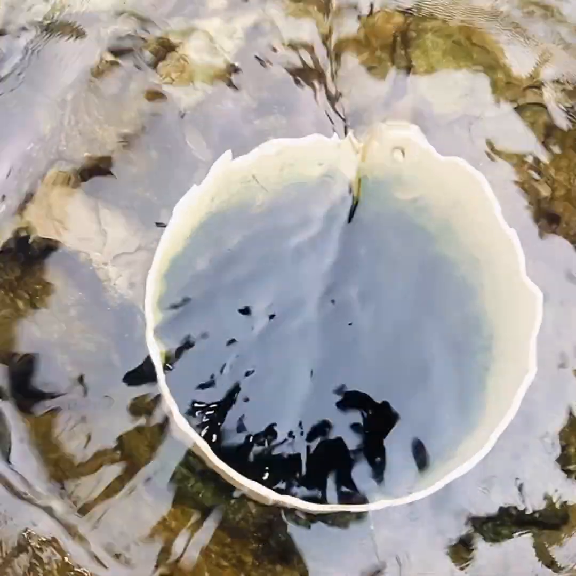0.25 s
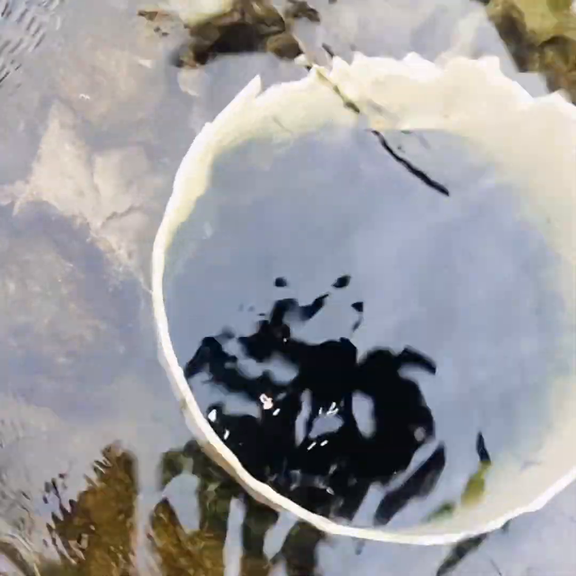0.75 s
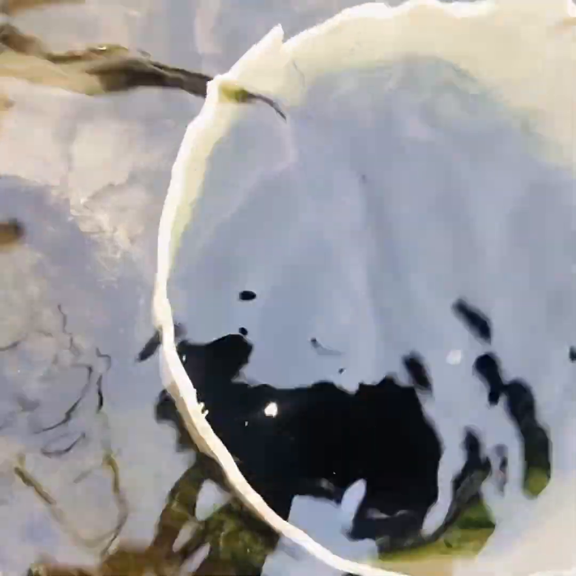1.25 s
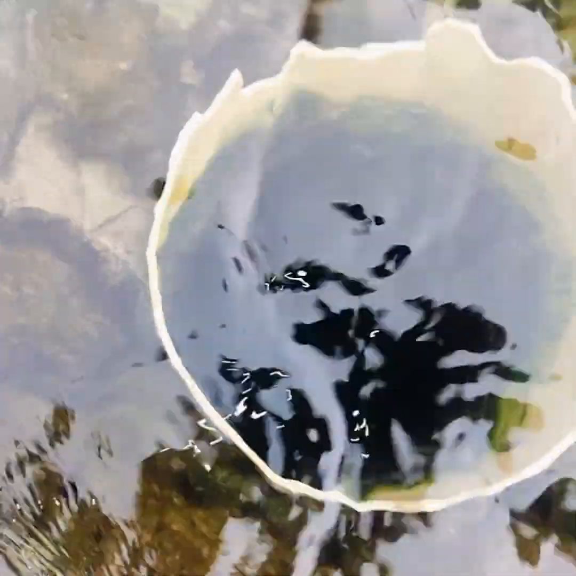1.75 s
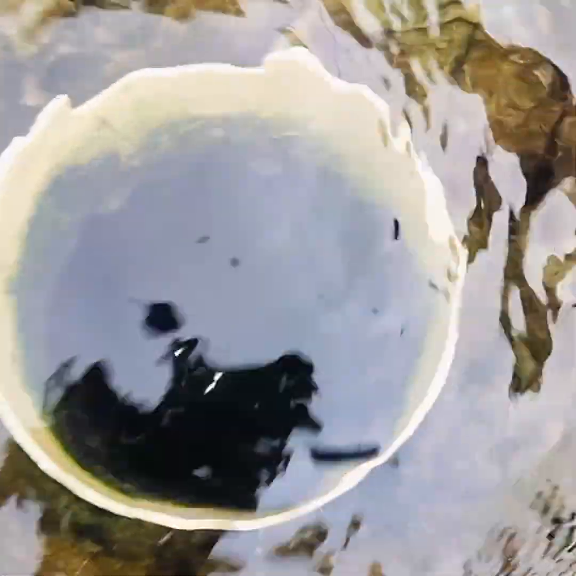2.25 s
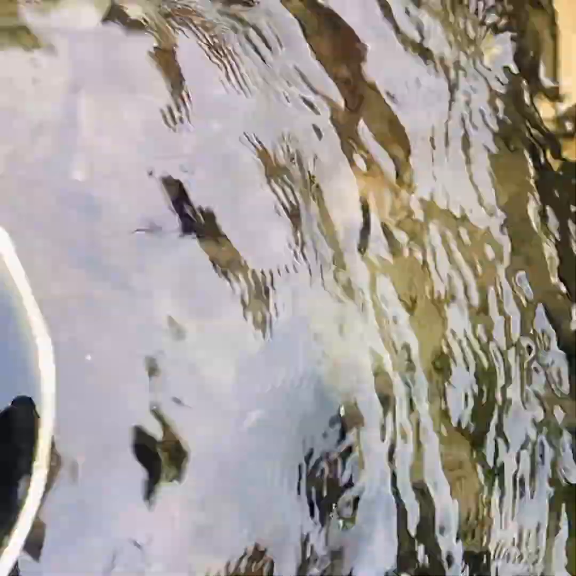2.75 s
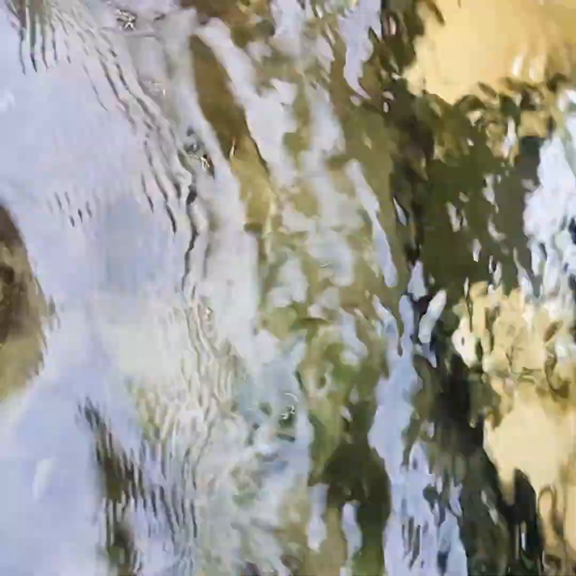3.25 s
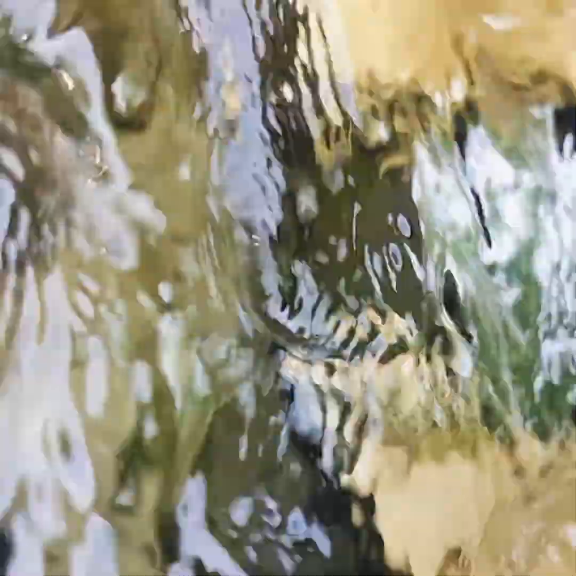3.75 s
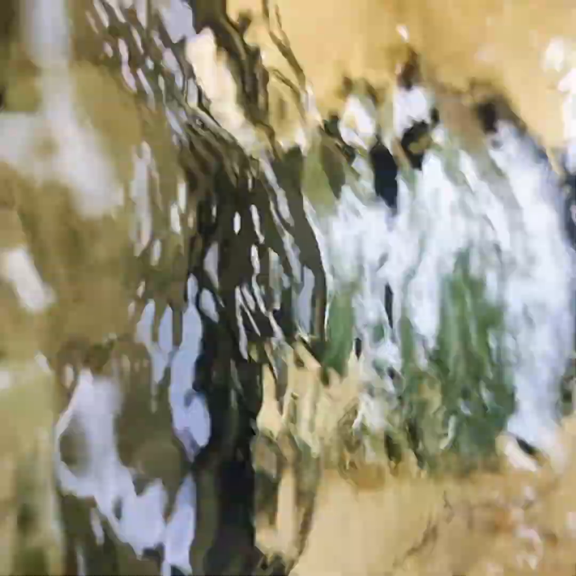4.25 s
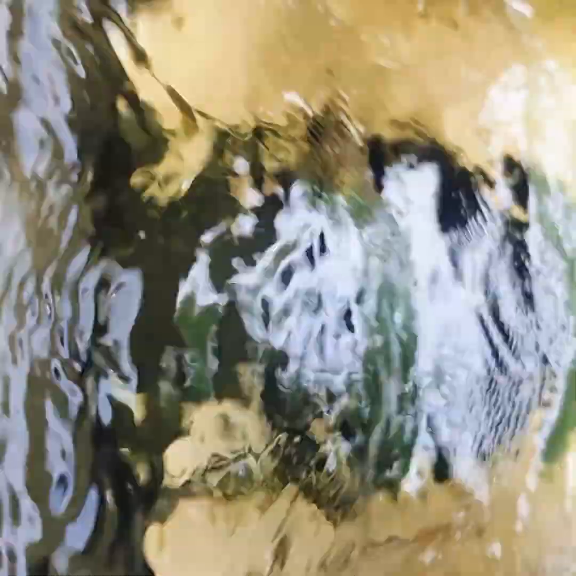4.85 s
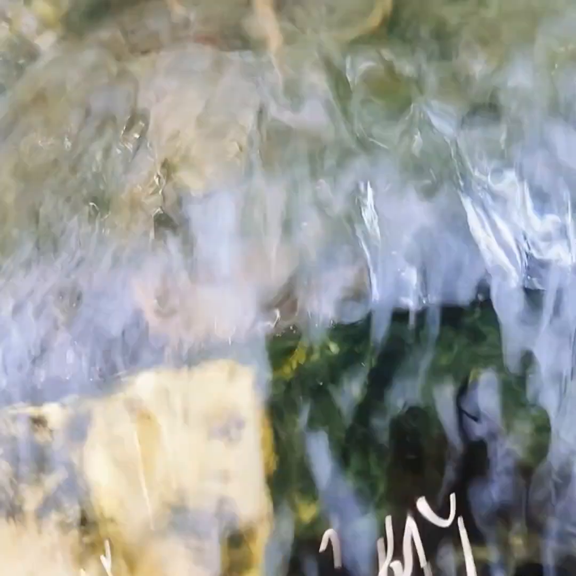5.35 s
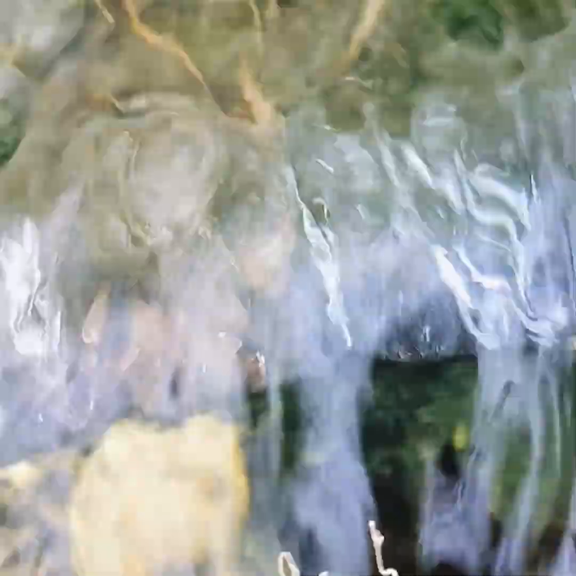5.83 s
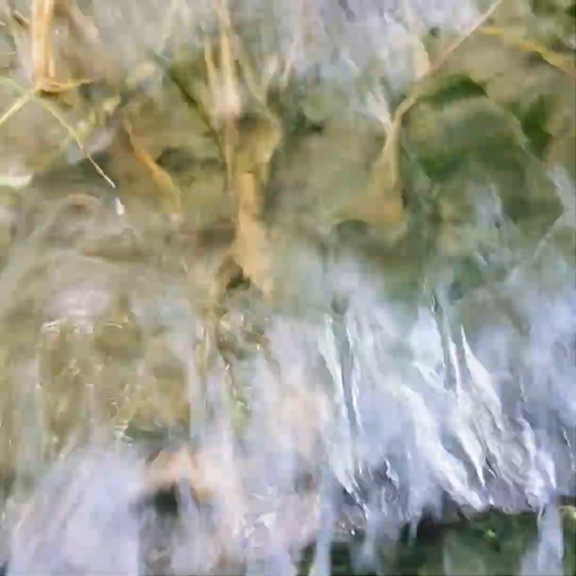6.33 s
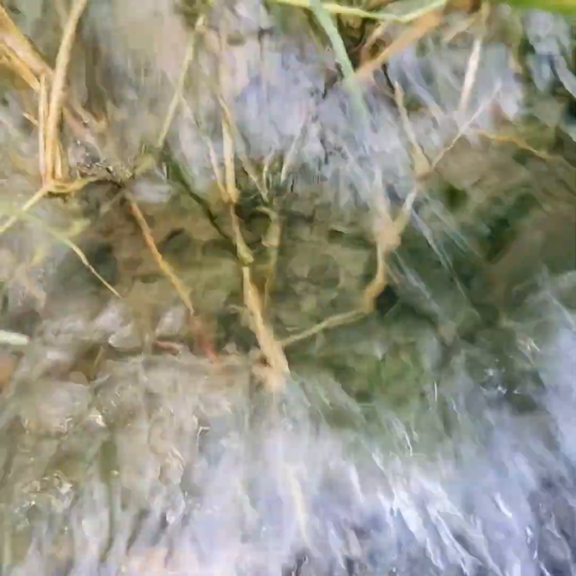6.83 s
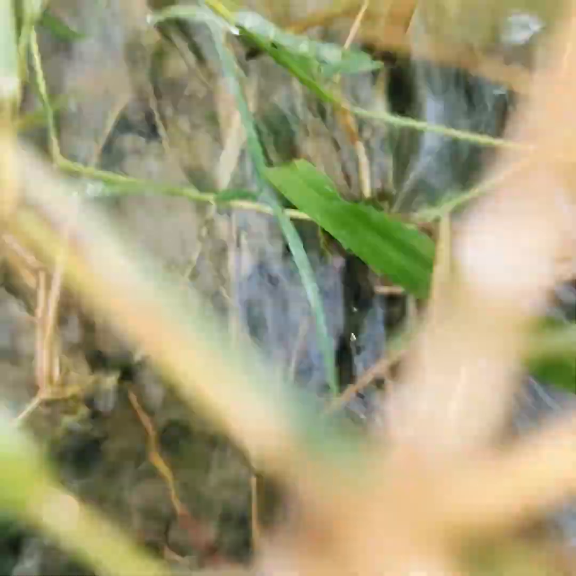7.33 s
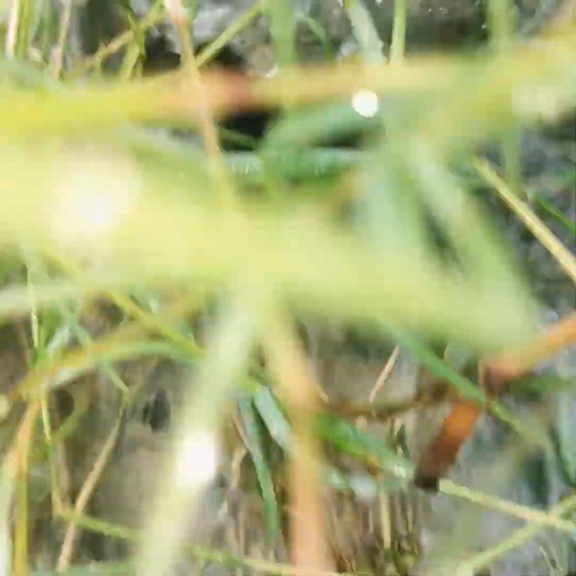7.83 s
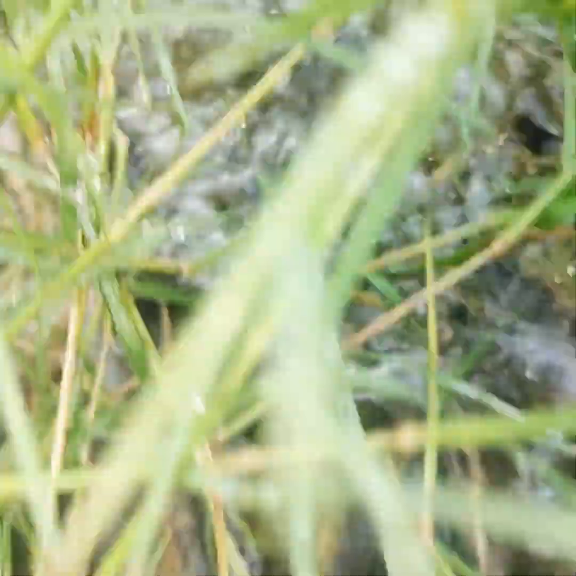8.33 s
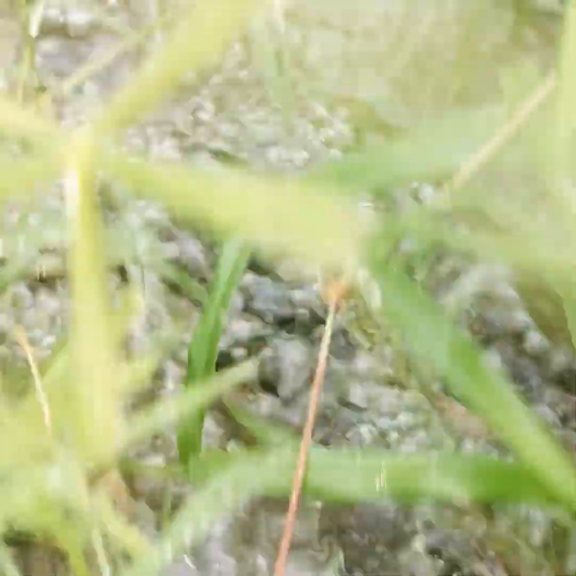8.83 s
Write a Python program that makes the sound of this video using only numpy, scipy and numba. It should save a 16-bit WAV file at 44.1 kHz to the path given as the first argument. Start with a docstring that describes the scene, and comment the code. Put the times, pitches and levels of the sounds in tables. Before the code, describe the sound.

Water trickles and gurgles over stones with small drips and plops, growing louder over a faint low rumble, twice cut by silence.

```python
"""Water wells out of a field inlet and trickles over stones into a paddy.
Each trapped bubble is a damped oscillator, its air the spring and the water the mass: large ones gurgle,
small ones fizz, and splashes spray on top. Hollows between stones and banks colour the water.
A deep drone throbs far off, wind stirs the two ports of a hand-held microphone, and a finger and a stem
each knock it once. The sound comes in three stretches with silence between."""
import sys
import numpy as np
from scipy import signal
from scipy.fft import rfft, irfft
from scipy.io import wavfile
from scipy.ndimage import uniform_filter1d, map_coordinates
from numba import njit

SR = 44100
rng = np.random.default_rng(int(sys.argv[2]) if len(sys.argv) > 2 else 0)


def transcribe(signal):
    """Save signal, clipped to [-1, 1], as a 16-bit WAV file at the path in sys.argv[1]."""
    frames = np.atleast_2d(signal).T
    limited = np.clip(frames, -1, 1)
    pcm = np.round(limited * 32767).astype(np.int16)
    wavfile.write(sys.argv[1], SR, pcm)


N = 400428

# Audible stretches (start [s], end [s])
STRETCHES = [(0, .3055), (.79, 5.511), (6.04, 9.08)]
# The water grows louder nearer the riffle (time [s], burble level [dB], fizz over burble [dB])
RIFFLE_LEVELS = [(.05, -50, -8.5), (0.281, -48, -6.5), (.85, -46, 1.5), (1.5, -44.5, 0.5), (2.1, -46, 0),
                 (3, -44.5, 0), (3.5, -42, 0), (4.4, -40, -1.5), (5.2, -42, -2.5), (5.46, -40.5, 1),
                 (6.1, -36.5, 2), (6.28, -35, 1), (6.68, -38.5, 2), (6.82, -36.5, 2), (7.1, -38, 1.5),
                 (8.1, -37.5, 2), (8.6, -36, 1.5), (9.05, -37, 0.4)]
# The deepest bubbles (time [s], level [dB])
GLUG_LEVELS = [(.15, -55.5), (.9, -63), (3, -63.5), (3.5, -75.5), (4.8, -78), (5.2, -52), (5.45, -60.5),
               (6.1, -47), (7.1, -48.5), (8.5, -57), (9.05, -52)]
# Spectral envelope of water and microphone (frequency [Hz], relative gain [dB])
WATER_SPECTRUM = [(150, -38), (250, -13.5), (324, -24.5), (413, -16), (507, -21), (624, -12), (809, -10),
                  (995, -7.5), (1480, -7), (2280, -4.5), (5220, -7.5), (6210, -5), (8920, -17.5),
                  (11600, -18)]
# Arrival-time difference as the microphone turns (time [s], lag of the left port [ms])
PORT_LAG = [(0, 0.26), (.801, 0.12), (2.601, 0.211), (3.201, -0.262), (5.4, -0.282), (6.1, 0.137),
            (8.3, -0.13), (8.8, -0.5)]
# Resonances and dead spots at three places (frequency [Hz], bandwidth [Hz], gain [dB])
INLET_HOLLOWS = [(890, 29, 4.5), (1664, 48, 4.5), (1755, 130, -13.5), (1840, 91, 6.5), (3300, 150, -3)]
STONE_HOLLOWS = [(1021, 62, -12.5), (1299, 90, 8), (1572, 50, 6.5), (1764, 87, -20), (3160, 210, -5),
                 (1800, 42, 12.5), (1930, 80, -17.5), (2094, 64.6, -18)]
STEM_HOLLOWS = [(1816, 560, -2)]
# Drone resonances (frequency [Hz], bandwidth [Hz], weight at the inlet [dB], weight among stems [dB])
DRONE_MODES = [(42.6, 13, -25, -12.5), (62.85, 10.2, -2, -3.5), (79.14, 5.5, -10.5, -1.5),
               (108, 8, -5.5, -10.5), (126, 19.8, -8, -7), (159.6, 23.5, -12.5, -17),
               (201, 31.4, -17.5, -17)]
# Finger impact (step level [dB], decay [s], left share [dB], port frequency [Hz], ring level [dB])
FINGER_IMPACT = (-11, .0042, -16, 6200, -7)
# The sharpest drops and the loudest bubbles (time [s], level [dB], frequency [Hz])
SHARP_DROPS = [(1.098, -21.5, 4670), (1.197, -26, 4900), (1.668, -22, 4800), (1.9283, -16.5, 6000),
               (2.095, -21, 5670), (2.236, -27, 6060), (2.2595, -23.5, 5700), (2.2817, -25, 5920),
               (2.378, -28, 6100), (3.066, -26, 4250), (3.2657, -25, 4320), (3.5256, -20, 7200),
               (3.7287, -11.5, 5200), (3.821, -24.5, 4200), (4.0077, -15, 4970), (4.271, -14, 5600),
               (4.876, -16.5, 6040), (5.0425, -19.5, 4940), (5.405, -19, 5200), (5.4273, -11, 6000),
               (6.0847, -7.5, 4020), (6.3443, -16, 4070), (6.61, -15, 6020), (6.693, -7.5, 7055),
               (6.845, -23, 5900), (7.024, -17.5, 6570), (7.1232, -21, 6240), (7.2237, -18, 4730),
               (7.3984, -16, 3570), (7.7403, -17, 4070), (7.9434, -15.5, 3200), (7.996, -14, 2870),
               (8.0266, -17, 6400), (8.2095, -17, 6230), (8.2403, -17, 5470), (8.273, -11, 2920),
               (8.3325, -18, 4570), (8.3741, -25, 6180), (8.411, -16, 6620), (8.4308, -27, 6890),
               (8.556, -11.5, 4620), (8.682, -12.5, 6260), (8.715, -6, 3920), (8.9024, -11, 5850)]
LOUD_BUBBLES = [(1.241, -24.5, 1740), (1.766, -23.5, 1600), (2.216, -31, 900), (2.286, -24, 1750),
                (2.406, -34, 686), (2.46, -16, 2680), (2.875, -29.5, 2420), (3.042, -25, 1700),
                (4.081, -19, 2120), (4.161, -18, 1330), (4.508, -23, 2550), (4.587, -22, 1310),
                (4.934, -19.5, 2230), (5.128, -28, 640), (6.265, -9.5, 3000), (6.543, -22, 1055),
                (6.683, -21, 2370), (6.779, -22.5, 630), (6.81, -23.5, 1110), (7.122, -16, 1010),
                (7.4, -15, 1004), (7.493, -23, 950), (7.528, -18.5, 2960), (7.555, -26, 1290),
                (7.698, -22, 1300), (7.865, -23.5, 1040), (7.911, -26, 836), (7.953, -18.5, 1920),
                (8.019, -22, 1000), (8.081, -17, 2590), (8.201, -22, 1200), (8.221, -18, 1090),
                (8.449, -17, 943), (8.642, -19, 2080), (8.906, -19.5, 2100)]
# The trickle thins: coarse fizz fades and drops tinkle by the right port
# (centre [s], half length [s], fizz gain [dB], added left minus right of drops [dB])
TRICKLE_LULL = (2.5, .5, -3, -17)
# Bright splashes (time [s], level [dB], centre frequency [Hz], decay [s])
BRIGHT_SPLASHES = [(2.594, -40, 7100, 0.032), (3.066, -36, 12500, 0.0055), (4.266, -34.5, 6960, .025),
                   (4.468, -40, 11500, .02), (5.089, -37.5, 8260, 0.0096)]
# Stem impact (time [s], level [dB], frequency [Hz], left minus right [dB])
STEM_IMPACT = (8.9805, -19, 130, 0)

TO_STONES_S, AMONG_STEMS_S = (2.8, 3.6), STRETCHES[2][0]  # when the microphone changes place
FAR_BURBLE_DB, FAR_GURGLE_DB, FAR_SPRAY_DB = -48.5, -58, -62.5  # levels from afar
GURGLE_GROWTH, SPRAY_GROWTH = 1.81, 1.235  # dB per dB of burble and of fizz
AHEAD_PAN_DB, DROP_PAN_DB = -4, -11  # pan is left minus right
WATER_PAN_DB_PER_MS, PLOP_PAN_DB_PER_MS = -6, -11  # pan follows the port lag
FIZZ_BANDS_HZ, FIZZ_CYCLES = ((3000., 4900.), (4900., 8000.)), 42  # cycles to decay by 60 dB
DRONE_DB, OPEN_FIELD_DB = -38, -3  # the drone is fainter in the first stretch
WIND_DB, WIND_HZ = -52.5, 32.1
TIME = np.arange(N) / SR
ANTIPHASE = np.array([[1], [-1]])


def undb(db):
    """Amplitude ratio of a level in decibels."""
    return 10 ** (np.asarray(db) / 20)


def level(x, db):
    """Normalisation to an RMS level."""
    return x * undb(db) / np.sqrt(np.mean(x ** 2))


def wander(rate_hz):
    """Slow random modulation: linear ramps between random values, with unit spread."""
    hold = int(SR / rate_hz)
    x = uniform_filter1d(np.repeat(rng.standard_normal(N // hold + 1), hold), hold)[:N]
    return x / x.std()


def resonate(x, hz, width_hz):
    """Second-order resonance with unit gain at its centre."""
    return signal.lfilter(*signal.iirpeak(hz, hz / width_hz, SR), x)


def ports(time_s, db, pan_db, lag_ms):
    """Time and level differences give direction: start sample and gain at each port."""
    start = np.maximum(np.array([time_s + lag_ms / 1000, time_s]) * SR, 0)
    return start, undb(db + np.array([pan_db, -pan_db]) / 2)


@njit
def damped_sines(n, start, hz, t60, gain, glide, swell):
    """Free decay of bubbles: each swells over a share of its life and rises in pitch near the surface."""
    out = np.zeros((2, n))
    for k in range(len(hz)):
        steps = int(t60[k] * SR)
        omega = 2 * np.pi * hz[k] / SR
        chirp, onset_decay = np.exp(1j * omega * glide / steps), np.exp(-1 / (swell * steps))
        for port in range(2):
            first = int(start[port, k]) + 1
            pole, onset = np.exp(1j * omega - np.log(1000) / steps), 1.
            phasor = np.exp(1j * omega * (first - start[port, k])) * gain[port, k]
            for j in range(max(0, min(steps, n - first))):
                out[port, first + j] += phasor.imag * (1 - onset)
                phasor *= pole
                pole *= chirp
                onset *= onset_decay
    return out


def splash_envelope(events, count, decay_s, scatter_db, event_weight):
    """Shot noise of mean 1: random splashes and the listed events each jump and decay exponentially."""
    when, size = rng.random((count, 2)).T
    hits = np.bincount((when * N).astype(int), undb(scatter_db * np.minimum(-np.log(1 - size), 3)), N)
    hits[(np.array(events)[:, 0] * SR).astype(int)] += event_weight
    envelope = uniform_filter1d(signal.lfilter([1], [1, -np.exp(-1 / (decay_s * SR))], hits), size=35)
    return envelope / envelope.mean()


def water_band(x, lo_hz, hi_hz):
    """Spectral shaping: one band of the water's spectral envelope."""
    f = np.maximum(np.fft.rfftfreq(N, 1 / SR), 1)
    hz, db = np.transpose(WATER_SPECTRUM)
    band = 1 / np.sqrt((1 + (lo_hz / f) ** 12) * (1 + (f / hi_hz) ** 12))
    return irfft(rfft(x) * undb(np.interp(np.log(f), np.log(hz), db)) * band, N)


def bubbles(lag_ms, activity, lo_hz, hi_hz, count, cycles, scatter_db, hiss_db, spread_ms, diffuse):
    """Incoherent sum: ringing bubbles crowd into each splash, over the hiss of unresolved ones."""
    when, pitch, size, place, life = rng.random((count, 5)).T
    birth = np.minimum(np.searchsorted(np.cumsum(activity) / activity.sum(), when), N - 1)
    hz = lo_hz * 0.789 * (1.54 * hi_hz / lo_hz) ** pitch
    # small bubbles ring briefly, so equal energy per Hz needs a larger swing
    db = 20 * np.log10(hz) + scatter_db * np.minimum(-np.log(1 - size), 3.5)
    start, gain = ports(birth / SR, db, 10 * (place - .5), lag_ms[birth] + spread_ms * (place - .5))
    t60 = cycles * (.5 + life) / hz
    swarm = damped_sines(N, start, np.minimum(hz, .4 * SR), t60, gain, glide=.04, swell=.04)
    direct, left, right = rng.standard_normal((3, N))
    delayed = map_coordinates(direct, [np.arange(N) - lag_ms * SR / 1000], order=3)
    hiss = activity * (np.array([delayed, direct]) + diffuse * np.array([left, right]))
    swarm, hiss = water_band(swarm, lo_hz, hi_hz), water_band(hiss, lo_hz, hi_hz)
    return level(level(swarm, 0) + level(hiss, hiss_db), 0)


def fizz_band(lag_ms, splash, lo_hz, hi_hz, spurt_db=1.3):
    """Amplitude modulation: droplets of one size come in short bursts and slower spurts of their own."""
    drops = [drop for drop in SHARP_DROPS if lo_hz <= drop[2] < hi_hz]
    spit = splash_envelope(drops, count=250, decay_s=.0082, scatter_db=2.5, event_weight=4)
    surge = (1 + .2 * splash + .35 * spit) * undb(spurt_db * wander(12))
    return bubbles(lag_ms, surge, lo_hz, hi_hz, count=3500, cycles=FIZZ_CYCLES,
                   scatter_db=2.1, hiss_db=1, spread_ms=.25, diffuse=1.5)


def trickle(lag_ms, coarse_gain):
    """Bubble resonance rises as size falls: glug, gurgle, burble, fizz and spray share the splashes."""
    times, *columns = np.transpose(RIFFLE_LEVELS)
    burble_db, fizz_over_db = (np.interp(TIME, times, column) for column in columns)
    fizz_db = burble_db + fizz_over_db
    glug_db = np.interp(TIME, *np.transpose(GLUG_LEVELS))
    gurgle_db = FAR_GURGLE_DB + GURGLE_GROWTH * (burble_db - FAR_BURBLE_DB)
    spray_db = FAR_SPRAY_DB + SPRAY_GROWTH * (fizz_db - FAR_BURBLE_DB)
    side_db = ANTIPHASE * (AHEAD_PAN_DB + WATER_PAN_DB_PER_MS * lag_ms) / 2
    splash = splash_envelope(LOUD_BUBBLES, count=500, decay_s=.008, scatter_db=2, event_weight=2)
    spit = splash_envelope(SHARP_DROPS, count=500, decay_s=.0035, scatter_db=3, event_weight=3)
    glug = bubbles(lag_ms, 1 + .2 * splash, 300, 542.5, count=500, cycles=37.5,
                   scatter_db=4, hiss_db=-6, spread_ms=.36, diffuse=1)
    gurgle = bubbles(lag_ms, 1 + .4 * splash, 547.7, 1133.3, count=1300, cycles=52,
                     scatter_db=3, hiss_db=-1, spread_ms=.57, diffuse=.84)
    burble = bubbles(lag_ms, 1 + .45 * splash, 1165, 3000, count=4000, cycles=60,
                     scatter_db=2.6, hiss_db=0, spread_ms=.5, diffuse=.8)
    coarse, fine = (fizz_band(lag_ms, splash, *band) for band in FIZZ_BANDS_HZ)
    fizz = (coarse * coarse_gain + fine) / np.sqrt(2)
    spray = bubbles(lag_ms, 1 + .13 * splash + .4 * spit, 10000, 16000, count=12000, cycles=FIZZ_CYCLES,
                    scatter_db=2, hiss_db=1, spread_ms=.11, diffuse=.82)
    return (glug * undb(glug_db)
            + gurgle * undb(gurgle_db + .15 * side_db)
            + burble * undb(burble_db + .71 * side_db)
            + fizz * undb(fizz_db + side_db)
            + spray * undb(spray_db + .6 * side_db))  # spray scatters, so it leans less to one side


def hollows(x, table):
    """Cavity resonance: hollows lift some frequencies and leave dead spots between."""
    for hz, width, db in table:
        x = x + (undb(db) - 1) * resonate(x, hz, width)
    return x


def drone(throb_db=.68):
    """Random excitation of narrow, deep resonances that throb together, nearly alike at both ports."""
    out = 0
    for hz, width, inlet_db, stems_db in DRONE_MODES:
        mid, side = (level(resonate(resonate(noise, hz, width), hz, 2.35 * width), 0)
                     for noise in rng.standard_normal((2, N)))
        weight = undb(np.where(TIME > AMONG_STEMS_S, stems_db, inlet_db))
        out = out + weight * (mid + .16 * side * ANTIPHASE)
    return level(out * undb(throb_db * wander(13)), DRONE_DB + OPEN_FIELD_DB * (TIME < STRETCHES[0][1]))


def wind(gust_db=1.7):
    """Pressure fluctuations of the wind buffet the two ports, partly correlated."""
    mid, side = (resonate(resonate(noise, WIND_HZ, 30), WIND_HZ, 60)
                 for noise in rng.standard_normal((2, N)))
    return level((mid + .33 * side * ANTIPHASE) * undb(gust_db * wander(4.6)), WIND_DB)


def finger_knock(at_s=.7987):
    """Step response: a finger lands by the right port, the pressure jumps and sags, the port rings."""
    step_db, sag_s, left_db, hz, ring_db = FINGER_IMPACT
    t = TIME - at_s
    step = -undb(step_db) * (t > 0) * (1.3 * np.exp(-np.abs(t) / sag_s) - .3 * np.exp(-np.abs(t) / .02))
    ring = undb(ring_db) * np.exp(-((t - .0015) / .0005) ** 2) * np.sin(2 * np.pi * hz * t)
    port_noise = resonate(resonate(rng.standard_normal((2, N)), hz, 1500), hz, 2500)
    rattle = (t > .002) * np.exp(-np.abs(t) / .01) * level(port_noise, -26)
    return np.array([undb(left_db) * (ring - step), step + ring]) + rattle


def ring_events(events, lag_ms, cycles, glide, swell):
    """Impulse excitation: one damped sine per (time [s], level [dB], frequency [Hz], pan [dB])."""
    time_s, db, hz, pan_db = np.transpose(events)
    start, gain = ports(time_s, db, pan_db, lag_ms[(time_s * SR).astype(int)])
    return damped_sines(N, start, hz, cycles / hz, gain, glide, swell)


def drop_ticks(lag_ms, pan_db):
    """Drop impact excites a brief, high ring; the drops fall to the right."""
    events = [(s, db, hz, pan_db[int(s * SR)]) for s, db, hz in SHARP_DROPS]
    return ring_events(events, lag_ms, cycles=36, glide=.054, swell=.049)


def plops(lag_ms):
    """Volume oscillation of single loud bubbles, gliding upward as they near the surface."""
    events = [(s, db, hz, PLOP_PAN_DB_PER_MS * lag_ms[int(s * SR)]) for s, db, hz in LOUD_BUBBLES]
    return ring_events(events, lag_ms, cycles=40.2, glide=.21, swell=.015)


def bright_splashes():
    """Time-bandwidth reciprocity: the shorter a fading burst of spray, the wider its band."""
    out, noise = 0, rng.standard_normal((2, N))
    for s, db, hz, decay_s in BRIGHT_SPLASHES:
        band = resonate(resonate(noise, hz, (.00182 / decay_s + .13) * hz), hz, .5 * hz)
        out = out + (TIME > s) * np.exp(-np.abs(TIME - s) / decay_s) * level(band, db)
    return out


def stem_bump(lag_ms):
    """Heavily damped vibration: a stem nudges the microphone with a low thud."""
    return ring_events([STEM_IMPACT], lag_ms, cycles=2.3, glide=0., swell=.017)


def scene():
    """Superposition of all sources at a microphone that moves from inlet to stones to stems."""
    lag_ms = np.interp(TIME, *np.transpose(PORT_LAG))
    centre_s, half_s, lull_db, lull_pan_db = TRICKLE_LULL
    lull = np.exp(-((TIME - centre_s) / half_s) ** 4)
    water = trickle(lag_ms, coarse_gain=undb(lull_db * lull))
    moved = np.interp(TIME, TO_STONES_S, (0, 1))
    near = (1 - moved) * hollows(water, INLET_HOLLOWS) + moved * hollows(water, STONE_HOLLOWS)
    water = np.where(TIME < AMONG_STEMS_S, near, hollows(water, STEM_HOLLOWS))
    drops = drop_ticks(lag_ms, DROP_PAN_DB + lull_pan_db * lull)
    water = water + drops + plops(lag_ms) + bright_splashes()
    return water + drone() + wind() + finger_knock() + stem_bump(lag_ms)


def record(dry):
    """Gating and band limiting: three stretches, each ending in a brief fade, pass a steep low-pass."""
    fade_s, cutoff_hz = .004, 16100
    gate = sum((TIME >= start) * np.clip((end - TIME) / fade_s, 0, 1) for start, end in STRETCHES)
    return signal.sosfilt(signal.ellip(10, .2, 80, cutoff_hz, fs=SR, output="sos"), dry * gate)


dry = scene()
out = record(dry)
transcribe(out)
```